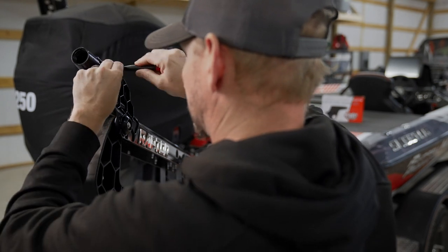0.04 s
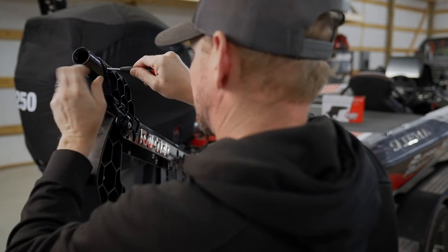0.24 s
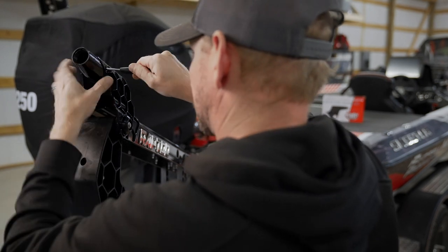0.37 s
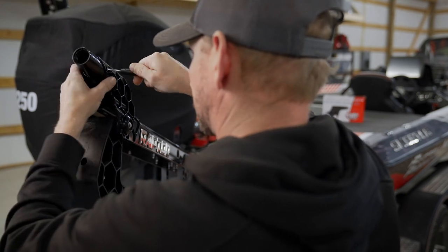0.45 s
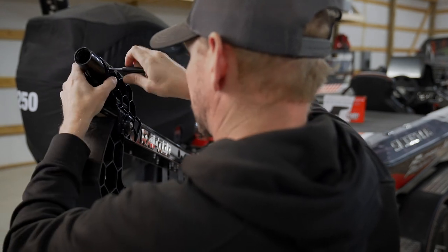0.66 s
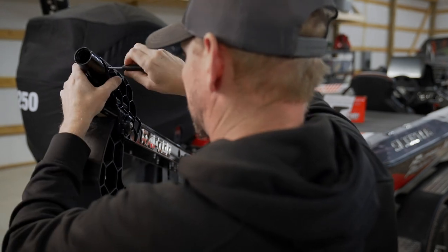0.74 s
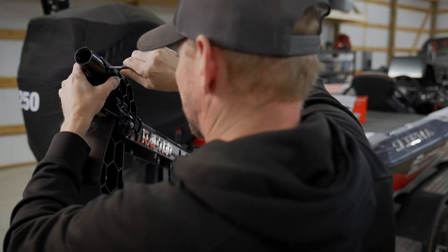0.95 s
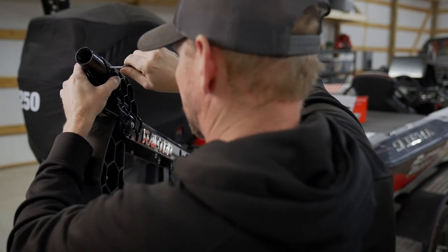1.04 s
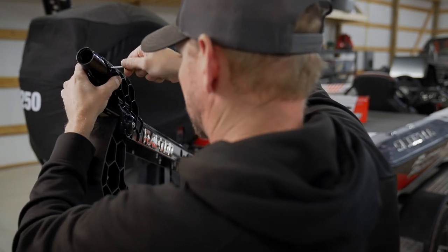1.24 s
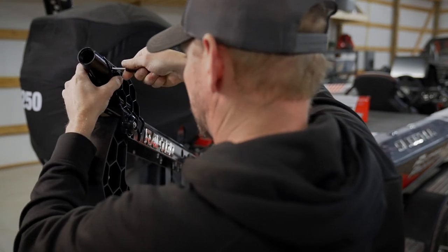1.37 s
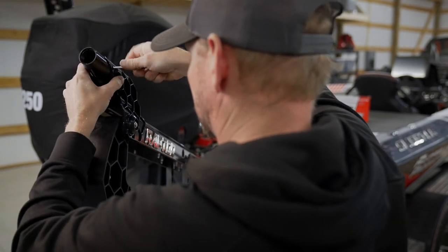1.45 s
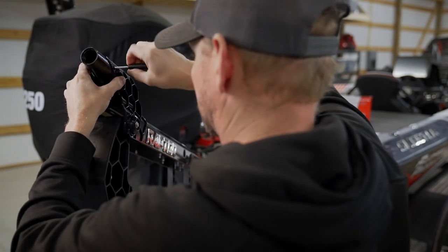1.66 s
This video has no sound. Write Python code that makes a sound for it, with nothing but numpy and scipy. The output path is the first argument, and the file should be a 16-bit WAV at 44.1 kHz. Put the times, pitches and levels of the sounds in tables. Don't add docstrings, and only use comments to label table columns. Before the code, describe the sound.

A hand screwdriver slips with a sharp metallic rattle, then makes small irregular clicks and ticks

```python
import sys
import numpy as np
from scipy import signal
from scipy.fft import rfft, irfft
from scipy.io import wavfile
from scipy.ndimage import uniform_filter1d

SR = 44100
rng = np.random.default_rng(int(sys.argv[2]) if len(sys.argv) > 2 else 0)


def boost(x):
    u = np.asarray(x, float) / 20
    return 10 ** u


def bounce(signal):
    frames = np.transpose(np.atleast_2d(signal))
    limited = np.clip(frames, -1, 1)
    pcm = np.round(limited * 32767).astype(np.int16)
    wavfile.write(sys.argv[1], SR, pcm)


N = 74970

# f/Hz, density/dB per Hz
AIR_SPECTRUM = [
    (15, -17),
    (25, -8.5),
    (92, 4),
    (256, -12),
    (591, -8),
    (659, -6),
    (2840, -29),
    (12500, -28),
    (16000, -38),
]
# t/s, level/dB
RUB_LEVEL = [
    (0, -55.5),
    (.22, -69),
    (.5, -42.5),
    (.75, -79),
    (1.0, -57),
    (1.3, -78),
    (1.7, -51),
]
# t/s, tip peak/dB, tip f/Hz, plastic level/dB
TICKS = [(0.0656, -70, 6380, -60), (0.0706, -55, 6040, -43.5), (0.1137, -54, 9450, -53.5),
         (0.452, -34, 7740, -43.5), (0.4546, -32.5, 7070, -36), (0.4778, -47, 8000, -48),
         (0.4986, -42, 8360, -54), (0.559, -50, 5900, -40), (0.5811, -50, 5100, -52.5),
         (0.6692, -38, 5450, -39.5), (0.6723, -35.5, 8240, -37), (0.6775, -37, 7460, -45),
         (0.7573, -61, 6600, -66), (0.8841, -84, 6150, -53), (0.897, -56, 7100, -70),
         (0.9026, -55, 7200, -78), (0.909, -62, 7190, -63), (0.942, -68, 9260, -55),
         (1.0287, -61, 9300, -55.5), (1.053, -42.5, 7460, -42.5), (1.0872, -56, 8560, -67),
         (1.2718, -54, 5456, -57), (1.332, -73, 5686, -56.5), (1.3943, -40.5, 8166, -47.5),
         (1.4184, -54, 7760, -67), (1.4256, -40.5, 7500, -48.5), (1.426, -54, 3500, -64),
         (1.4265, -47.5, 4860, -60), (1.4475, -63, 8434, -53), (1.527, -70, 5274, -65),
         (1.5735, -52, 7700, -53.5), (1.5872, -44, 7937, -63)]
# t/s, tip peak/dB, tip f/Hz, plastic level/dB
RATTLE = [(.2056, -32, 7900, -43), (.2072, -30, 6150, -48), (.2102, -14, 10500, -26),
          (.2128, -18.5, 11100, -37), (.2147, -13, 9700, -28), (.217, -19, 7000, -34.5),
          (.219, -34, 10800, -29), (.2217, -10, 6360, -32), (.2224, -14, 10260, -30),
          (.2245, -24.5, 5950, -31.5), (.2328, -26.5, 6500, -35), (.235, -28, 5440, -43),
          (.2376, -24, 7400, -39.5), (.2397, -26.5, 6960, -38), (.2418, -15.5, 7540, -48),
          (.2445, -20.5, 5840, -44), (.2492, -24, 9000, -20.5), (.2125, -22.5, 3320, -43),
          (.258, -34, 4580, -49), (.2512, -17.5, 9600, -29.5), (.2553, -16, 8300, -37),
          (.2575, -16, 10000, -42), (.2587, -11, 7320, -45), (.2622, -14, 10300, -40.5),
          (.2645, -19.5, 6300, -36), (.2664, -14.5, 10400, -39), (.2677, -17, 6280, -37),
          (.2718, -15.5, 9100, -28), (.2735, -24.5, 5840, -24.5), (.2765, -29, 7000, -44),
          (.681, -46.5, 12400, -50)]
# f/Hz, level/dB, T60/s
PLASTIC_MODES = [(1066, -11, 0.063), (1200, -15.5, 0.056), (1370, -0.5, 0.0087), (1673, -5.5, 0.0069),
                 (1930, -1, 0.0066), (2313, -4.5, 0.0056), (3080, -16.5, 0.013)]
# t/s, peak/dB, f/Hz, hold/s
SLIP_KNOCKS = [(.067, -37.5, 730, 0.0042), (.075, -37.5, 686, 0.0086), (.080, -39, 703.1, 0.0011),
               (.102, -52, 708.4, .004), (.113, -50.5, 847, 0.0028), (.119, -41.5, 697.6, 0.0019),
               (.143, -57, 720, 0.0032), (.158, -54, 736.3, 0.0067), (.178, -36, 720, 0.0018),
               (.198, -32.5, 713.7, 0.0057), (.207, -30.5, 730.5, 0.0069), (.213, -36.5, 632.3, 0.0071),
               (.221, -29, 713, 0.0066), (.240, -37.5, 720.7, 0.0093), (.2502, -22, 798, 0.0015),
               (.258, -23, 710.4, 0.0017), (.268, -25, 669.6, 0.002), (.274, -30, 885, 0.0031),
               (.285, -36, 862.5, 0.0014)]
# t/s, peak/dB, f/Hz, hold/s
TURN_KNOCKS = [(.417, -48, 744, 0.0022), (.423, -43, 720, 0.0013), (.430, -55, 734.8, 0.0016),
               (.451, -39.5, 720, 0.0014), (.4555, -32.5, 725, 0.0027), (.467, -45.5, 698, 0.0087),
               (.481, -40.5, 620.5, 0.0066), (.502, -40, 666, 0.0025), (.523, -54, 680.3, .002),
               (.561, -40.5, 674.7, 0.003), (.582, -43, 655.3, 0.007), (.604, -53, 698.3, .004),
               (.621, -48, 720, 0.0079), (.656, -46.5, 667, 0.0055), (.6695, -35.5, 693, 0.001),
               (.6725, -29.5, 692.5, 0.0021), (.680, -35.5, 674.7, 0.0062), (.711, -50.5, 667, 0.0061),
               (.742, -43, 718.3, 0.0051), (.758, -47.5, 709.6, 0.004), (.809, -53, 705.2, 0.01),
               (.886, -52, 697.4, 0.0031), (.907, -55.5, 889, 0.019), (.942, -58.5, 928.5, 0.0051),
               (1.049, -45, 649.7, 0.0039), (1.087, -55.5, 740.3, 0.0062), (1.275, -44.5, 682, 0.0047),
               (1.332, -54.5, 716, 0.012), (1.375, -53, 697, 0.0017), (1.395, -54, 737, 0.0024),
               (1.410, -48, 669.4, 0.0081), (1.427, -42.5, 668, 0.0094), (1.576, -46, 668, 0.0018),
               (1.588, -49.5, 651, 0.0017), (1.644, -53, 624, 0.0022)]
# t/s, peak/dB, f/Hz, hold/s
HIGH_KNOCKS = [(0.074, -43, 890, 0.0026), (0.071, -60, 2200, 0.0041), (0.084, -55, 873, .001),
               (0.267, -39.5, 403, 0.0072), (0.214, -42, 403, 0.0047), (1.05, -53, 1110, .001),
               (1.049, -52.5, 1743, 0.00091), (1.331, -64, 2300, .001), (0.2517, -34, 1120, .001),
               (0.4244, -55, 920, 0.0026), (0.43, -44.5, 897, .002), (0.425, -53, 1445, 0.0022),
               (0.453, -42, 919, 0.0053), (0.449, -50, 1710, .002), (0.543, -58, 910, 0.0022),
               (0.558, -47, 910, 0.0012), (.6695, -34.5, 915.4, 0.0056), (.670, -41.5, 1444, 0.0018),
               (.682, -51.5, 1976, 0.0034), (0.689, -47.5, 950, 0.0026), (1.029, -54, 1200, 0.0046),
               (1.053, -46.5, 890, 0.0028), (1.05, -47, 1400, 0.00081), (1.272, -55, 1556, 0.001),
               (1.275, -62, 2153, 0.0018), (1.426, -51, 1450, 0.0018), (1.526, -67.5, 2200, 0.0022),
               (1.574, -56, 1494, 0.00055), (1.575, -49.5, 927, 0.0019)]
# t/s, level/dB
THUMPS = [
    (0.213, -46),
    (0.26, -47.5),
]
# f/Hz, T60/s, level/dB
ECHO_BANDS = [
    (336, 0.64, -20),
    (820, 0.92, -34.5),
    (1400, 0.53, -21),
    (2710, 1, -28),
    (4950, 1, -38.5),
    (8560, 0.75, -36),
    (13760, 0.24, -25.5),
]

AIR_DB, RUMBLE_TOP_HZ, RUMBLE_SWAY_DB = -60.5, 130, 2
RUB_PER_S, RUB_HZ, RUB_HIGH_HZ, RUB_HIGH_DB = 450, 720, 1360, -3.5
TICK_RISE_S, TICK_T60_S, TICK_TAIL_DB, TICK_TAIL_T60_S = .0009, .004, -21, .02
TICK_LOW_RATIO, TICK_TOP_RATIO = .62, 1.47
TICK_RING_DB, TICK_RING_T60_S, TICK_RING_GRIT = -1.5, .005, .45
PLASTIC_DB, BLOW_T60_S, BLOW_GRIT, MOUNT_LOW_HZ = -8.5, .049, .71, 770
KNOCK_ATTACK_S, KNOCK_RELEASE_S, KNOCK_SAG_DB_PER_S = .003164, .0034, 316
KNOCK_TAIL_DB, KNOCK_TAIL_T60_S, KNOCK_ROUGH, KNOCK_GAIN_DB = -25.5, .08, .15, 2
PARTNER_RATIO, PARTNER_DB, TUBE_LOW_HZ = 1.287, -14.5, 450
THUMP_HZ, THUMP_T60_S, HOLLOW_HZ, HOLLOW_DB = 161.6, .16, 395.6, -7.5
ECHO_DB, ECHO_RISE_S = -35, .0011
RACK_HZ, RACK_WIDTH_HZ, RACK_T60_S, RACK_DB = 4450, 450, .5, -62


def rms_one(x):
    return x / np.sqrt(np.mean(x ** 2) + 1e-20)


def band(x, low_hz, high_hz):
    return signal.sosfilt(signal.butter(2, [low_hz, min(high_hz, .45 * SR)], "band", fs=SR, output="sos"), x)


def ring(clicks, hz, t60_s):
    r = boost(-60 / (t60_s * SR))
    w = 2 * np.pi * hz / SR
    return signal.lfilter([0, np.sin(w)], [1, -2 * r * np.cos(w), r * r], clicks + 1e-18)


def add(out, s, x):
    i = int(s * SR)
    out[i:i + len(x)] += x[:len(out) - i]


def air():
    hz, db = np.transpose(AIR_SPECTRUM)
    shape = boost(np.interp(np.log(np.fft.rfftfreq(N, 1 / SR) + 1), np.log(hz), db))
    noise = rms_one(irfft(rfft(rng.standard_normal(N)) * shape, N))
    rumble = signal.sosfiltfilt(signal.butter(2, RUMBLE_TOP_HZ, fs=SR, output="sos"), noise)
    sway = np.interp(np.arange(N), np.linspace(0, N, 24), rng.standard_normal(24))
    return boost(AIR_DB) * (noise + rumble * (boost(RUMBLE_SWAY_DB * sway) - 1))


def rubbing():
    slips = rng.random(N) < RUB_PER_S / SR
    push = rng.standard_normal(N)
    grains = slips * push * boost(0.67 * np.minimum(rng.exponential(1, N), 2))
    body = rms_one(ring(grains, RUB_HZ, 0.013) + 3.9 * ring(grains, 840, 0.033))
    body += boost(RUB_HIGH_DB) * rms_one(ring(grains, RUB_HIGH_HZ, 0.022))
    s, db = np.transpose(RUB_LEVEL)
    return boost(np.interp(np.arange(N) / SR, s, db) - 15) * body


def tip_crack(t, hz):
    decay = boost(-60 * t / TICK_T60_S) + boost(TICK_TAIL_DB - 60 * t / TICK_TAIL_T60_S)
    crack = rng.standard_normal(len(t)) * np.clip(t / TICK_RISE_S, 0, 1) * decay
    wide = band(crack, TICK_LOW_RATIO * hz, TICK_TOP_RATIO * hz)
    coloured = ring((t == 0) + TICK_RING_GRIT * crack, hz, TICK_RING_T60_S)
    return (wide / abs(wide).max() + boost(TICK_RING_DB) * coloured / abs(coloured).max()) / 2


def plastic_blow(t):
    blow = (t == 0) + BLOW_GRIT * rng.standard_normal(len(t)) * boost(-60 * t / BLOW_T60_S)
    return blow / np.sqrt(np.sum(blow ** 2)) * 2


def ticks():
    tip, blows = np.zeros(N), np.zeros(N)
    t = np.arange(SR // 20) / SR
    for s, db, hz, plastic_db in list(RATTLE) + list(TICKS):
        add(tip, s, boost(db) * tip_crack(t, hz))
        add(blows, s, boost(plastic_db + PLASTIC_DB) * plastic_blow(t))
    mount = sum(boost(db) * ring(blows, hz, t60_s) for hz, db, t60_s in PLASTIC_MODES)
    return tip + band(mount, MOUNT_LOW_HZ, SR)


def touch(t, hold_s):
    rise = np.sin(np.pi / 2 * np.clip(t / KNOCK_ATTACK_S, 0, 1)) ** 2
    damped = np.exp(-(np.maximum(t - KNOCK_ATTACK_S - hold_s, 0) / KNOCK_RELEASE_S) ** 2)
    fall = boost(-KNOCK_SAG_DB_PER_S * t) * damped
    return rise * (fall + boost(KNOCK_TAIL_DB - 60 * t / KNOCK_TAIL_T60_S))


def knocks():
    swing, high = np.zeros(N), np.zeros(N)
    t = np.arange(SR // 8) / SR
    rows = list(SLIP_KNOCKS) + list(TURN_KNOCKS)
    lead_s = KNOCK_ATTACK_S / 2
    for s, db, hz, hold_s in rows:
        add(swing, s - lead_s, boost(db + KNOCK_GAIN_DB) * touch(t, hold_s))
    for s, db, hz, hold_s in HIGH_KNOCKS:
        add(high, s - lead_s, boost(db + KNOCK_GAIN_DB) * touch(t, hold_s) * np.sin(2 * np.pi * hz * t))
    s, _, hz, _ = np.transpose(rows)
    latest = np.maximum(np.searchsorted(s - lead_s, np.arange(N) / SR) - 1, 0)
    phase = 2 * np.pi * np.cumsum(uniform_filter1d(hz[latest], size=64)) / SR
    low = swing * (np.sin(phase) + boost(PARTNER_DB) * np.sin(PARTNER_RATIO * phase))
    wobble = 1 + KNOCK_ROUGH * rms_one(band(rng.standard_normal(N), 60, 400))
    return band(band((low + high) * wobble, TUBE_LOW_HZ, SR), TUBE_LOW_HZ, SR)


def thumps():
    clicks = np.zeros(N)
    for s, db in THUMPS:
        clicks[int(s * SR)] = boost(db)
    return ring(clicks, THUMP_HZ, THUMP_T60_S) + boost(HOLLOW_DB) * ring(clicks, HOLLOW_HZ, THUMP_T60_S / 2)


def shop(x):
    t = np.arange(SR) / SR
    echo = np.zeros(SR)
    for hz, t60_s, db in ECHO_BANDS:
        noise = rms_one(band(rng.standard_normal(SR), hz / 1.23, hz * 1.336))
        echo += boost(db - 60 * t / t60_s + ECHO_DB) * noise
    rack = band(rng.standard_normal(SR), RACK_HZ - RACK_WIDTH_HZ / 2, RACK_HZ + RACK_WIDTH_HZ / 2)
    echo += boost(RACK_DB - 60 * t / RACK_T60_S) * rms_one(rack)
    return signal.fftconvolve(x, echo * np.clip(t / ECHO_RISE_S, 0, 1))[:N]


def scene():
    work = knocks() + ticks() + thumps()
    return (work + shop(work) + rubbing() + air())[None]


def top_cut(x):
    return signal.sosfilt(signal.butter(12, 16670, fs=SR, output="sos"), x)


def record(dry):
    low_pass = signal.cheby2(10, 40, 16400, fs=SR, output="sos")
    mix = signal.sosfilt(low_pass, dry)
    return top_cut(mix)


dry = scene()
out = record(dry)
bounce(out)
```